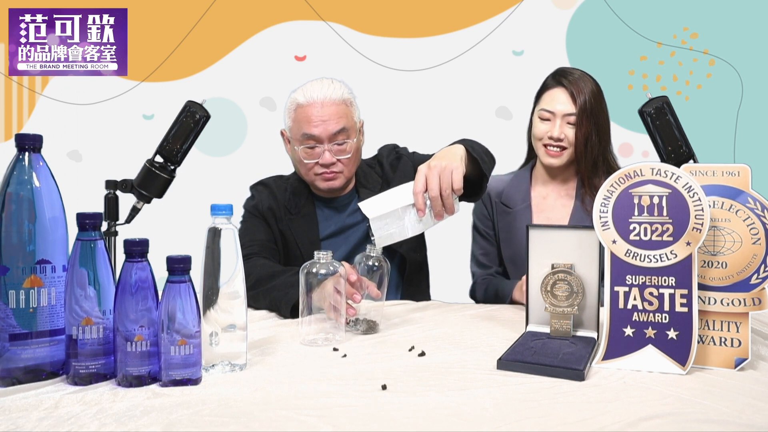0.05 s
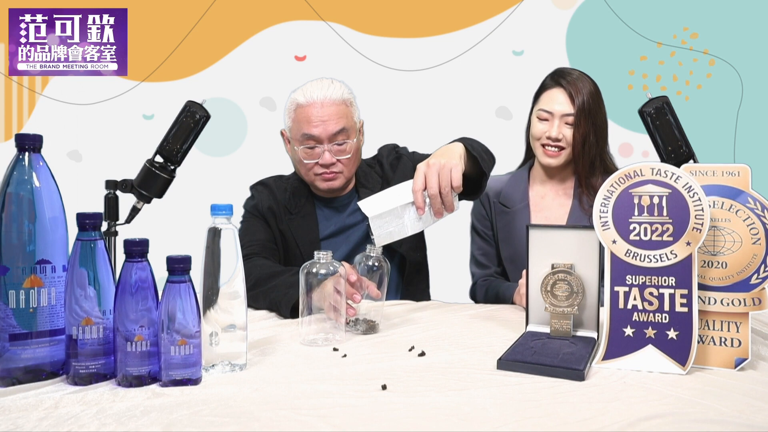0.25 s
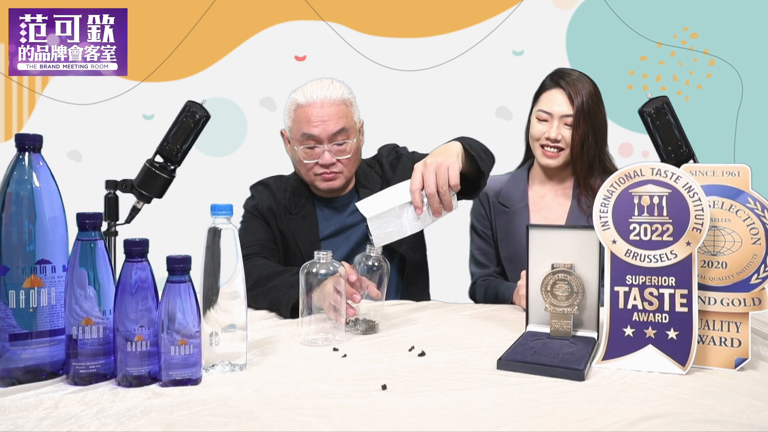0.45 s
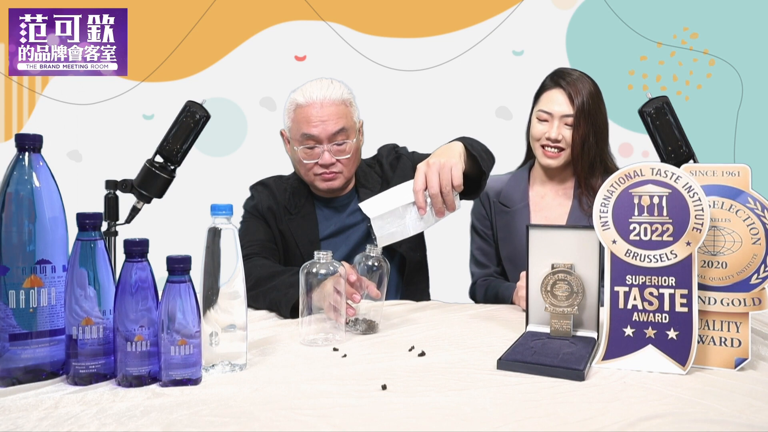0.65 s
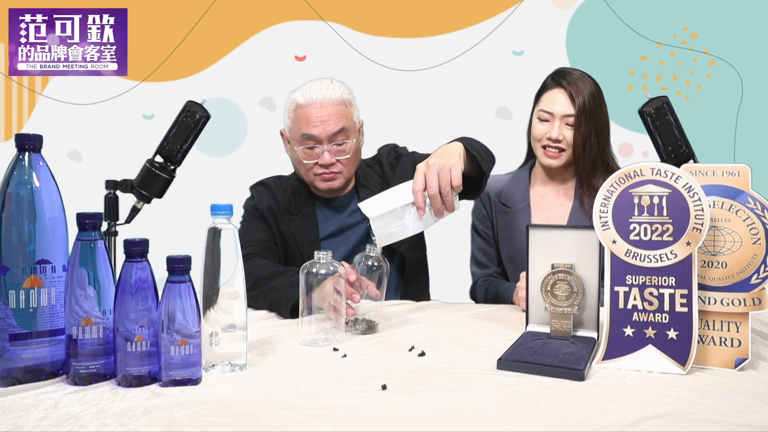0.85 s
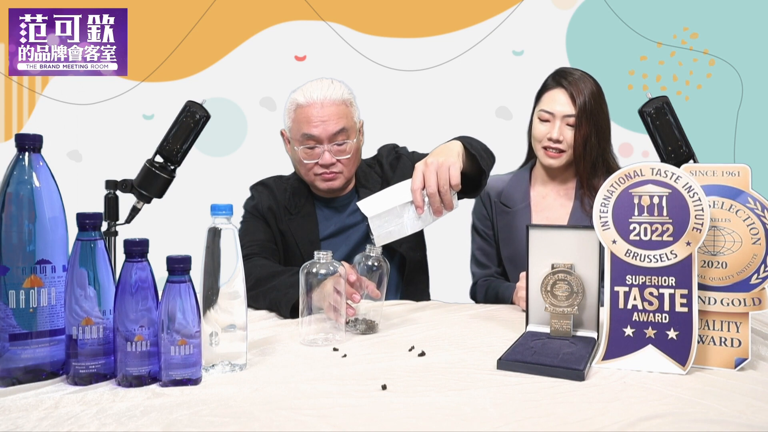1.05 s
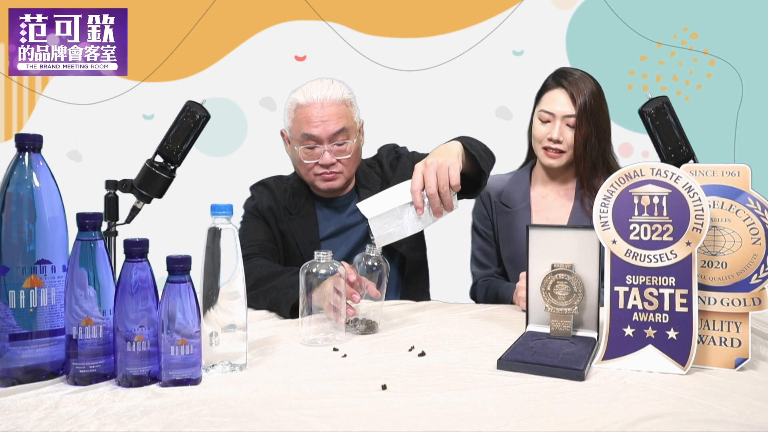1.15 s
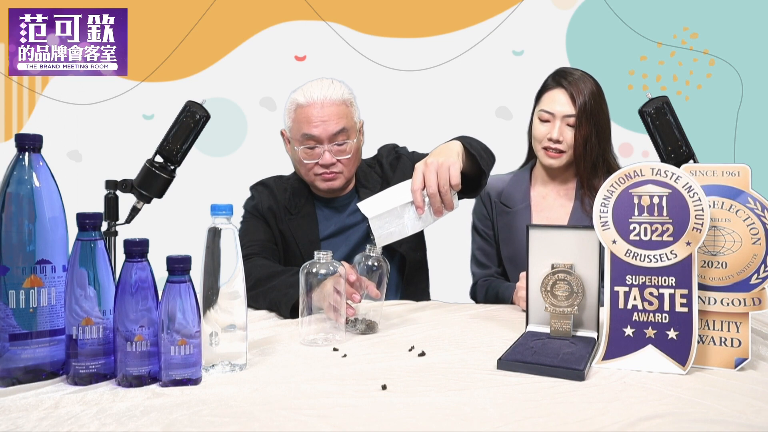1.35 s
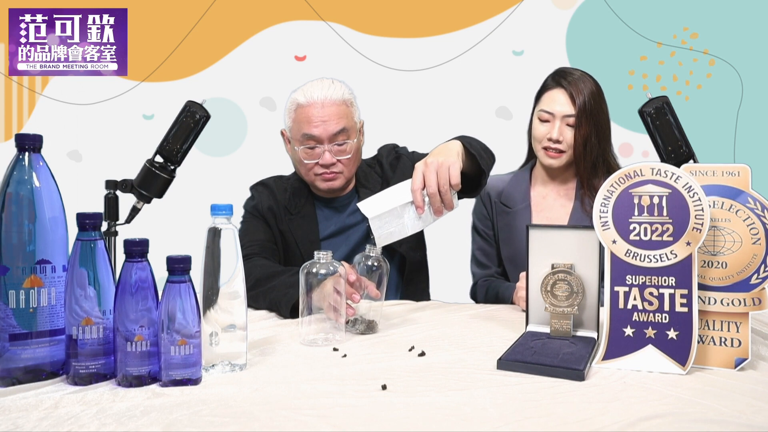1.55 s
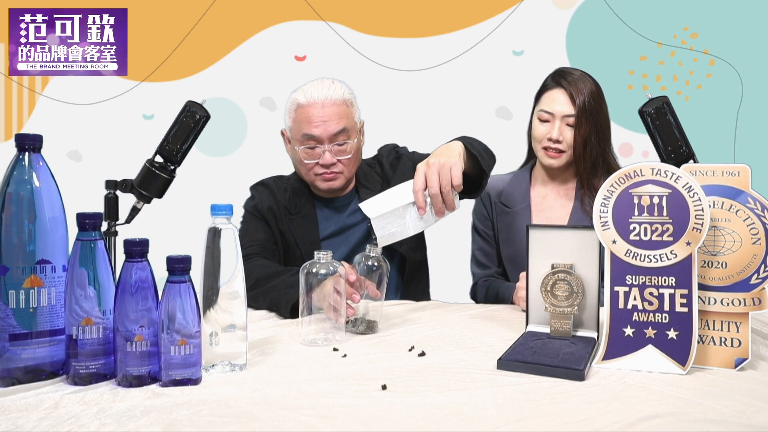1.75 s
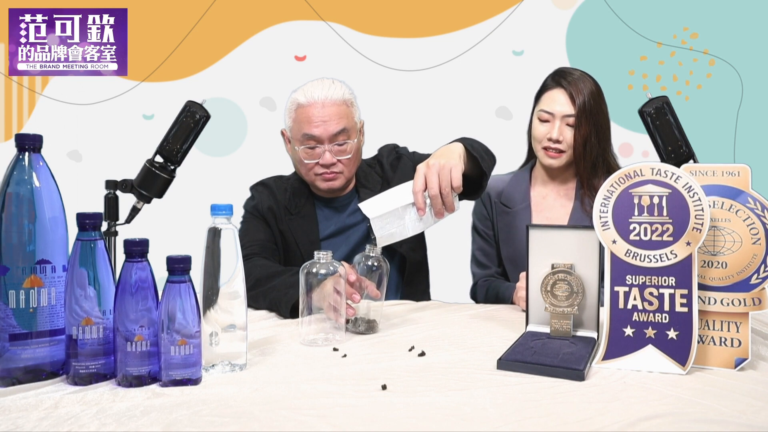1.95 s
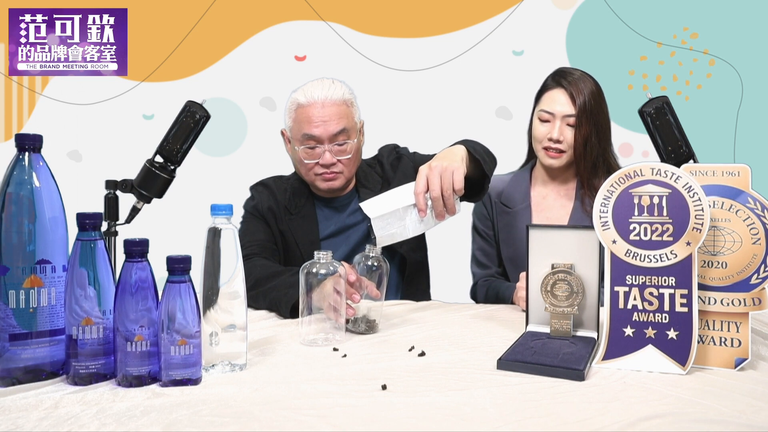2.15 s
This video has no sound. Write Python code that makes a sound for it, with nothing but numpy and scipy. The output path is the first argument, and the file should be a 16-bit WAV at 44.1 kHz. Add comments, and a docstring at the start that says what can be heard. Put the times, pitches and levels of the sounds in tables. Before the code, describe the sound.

Loose dry leaves rattle into a thin plastic bottle, a few hollow knocks and brief packet scrapes early, then busier ticking that continues to the end; close, left of centre, short room tail, faint rumble and hiss.

```python
"""Dry tea leaves are tapped out of a stiff packet into a plastic bottle, in a small damped room.
Over low rumble and faint hiss, clumps of leaves land from the start, as short shaped showers of clicks that
rattle, some with a hollow knock from the ringing wall. Early on, leaves slide in the packet (dense ticks) and
handling bumps dully (low dying sines). Later a trickle of single ticks grows into a steady patter, with
a few bright clinks (short ringing notes). A diffuse tail follows the leaves; all is panned left."""
import sys
import numpy as np
from scipy import signal
from scipy.fft import rfft, irfft
from scipy.io import wavfile
from scipy.ndimage import uniform_filter1d

SR = 44100
rng = np.random.default_rng(int(sys.argv[2]) if len(sys.argv) > 2 else 0)


def transcribe(u):
    """Save the signal u as a 16-bit wav file named by the first command-line argument.

    u: samples, shape (n,) or (channels, n), limited to [-1, 1]; the rate is SR.
    q: integer samples, one column per channel.
    """
    v = np.clip(np.atleast_2d(u).T, -1, 1)
    q = np.round(v * 32767).astype(np.int16)
    wavfile.write(sys.argv[1], SR, q)


N = 97593
TIME = np.arange(N) / SR

# Every spectrum below is a relative shape: it is scaled to unit energy before use.
# spectrum of the rumble and hiss: (frequency [Hz], density [dB per Hz])
BACKGROUND_COLOUR = [(25, 0), (45, -90), (60, -18.5), (112, -1), (160, -6), (300, -7), (500, -16.5),
                     (1500, -17), (4000, -28.5), (9000, -33.5), (15000, -31.5)]
# background level, with brief dips: (time [s], level [dB])
BACKGROUND_LEVEL = [(0, -65), (.018, -88), (.035, -58), (.25, -61), (.37, -59.5), (.405, -76.5), (.42, -59),
                    (.455, -61), (.497, -82), (.515, -64), (.66, -57.5), (.69, -76), (.73, -51.5),
                    (.785, -68.5), (.81, -60.5), (2.21, -57)]
# dull bumps of handling: (time [s], level before filtering [dB])
HANDLING_BUMPS = [(.078, -35.5), (0.414, -52), (0.508, -47.5), (0.594, -49), (0.637, -57), (.72, -82),
                  (0.818, -51), (.85, -44)]
# leaves sliding inside the packet: (time [s], peak level of the swell [dB], length [s])
PACKET_SLIDES = [(.161, -40.5, 0.017), (0.525, -52.5, 0.033), (0.56, -66, 0.0028), (0.958, -47, 0.027),
                 (1.123, -45.5, 0.025), (1.413, -43, .03)]
# spectrum of the sliding: (frequency [Hz], density [dB per Hz])
SLIDE_COLOUR = [(500, -18), (2000, -9.5), (2600, 1), (3300, 4), (4100, 0.5), (5000, -7), (6500, -12.5),
                (9000, -21), (15000, -30.5)]
# hard leaves clinking on the bottle: (time [s], level before the mode levels [dB], pitch [Hz])
LEAF_CLINKS = [(0.818, -27.5, 2500), (0.954, -38, 2430), (1.19, -30.5, 2630), (1.193, -30, 1420),
               (1.35, -30, 2570), (1.366, -18.5, 2820), (1.658, -29, 2980), (1.733, -23, 2720),
               (1.763, -28.5, 1430), (1.779, -30, 2880), (2.074, -26.5, 2710)]
# modes of a clink: (multiple of its pitch [ratio], relative level [dB], 60 dB decay [s])
CLINK_PARTIALS = [(1, -0.5, .024), (1.12, -33, 0.014), (1.45, -8, 0.015)]
# flow of single leaves, before the path levels: (time [s], level [dB])
LEAF_FLOW = [(0, -88.5), (.19, -56.5), (.3, -72.5), (.5, -92), (.6, -62.5), (.88, -75), (.95, -51),
             (1.045, -58.5), (1.1, -58), (1.18, -48.5), (1.32, -53.5), (1.4, -50.5), (1.55, -51),
             (1.6, -43), (1.74, -43), (1.81, -45), (1.93, -45.5), (2.05, -46), (2.21, -48.5)]
# spectrum of the patter: (frequency [Hz], density [dB per Hz])
PATTER_COLOUR = [(400, -22.5), (800, -0.5), (1400, 0.5), (2100, 0.5), (2750, 5), (3500, 4.5), (4400, 0.5),
                 (5500, -4), (6900, -8.5), (7800, -11.5), (10000, -16), (15000, -25)]
# spectrum of soft thuds on the pile: (frequency [Hz], density [dB per Hz])
THUD_COLOUR = [(60, -43), (150, -8.5), (280, 7), (450, 1.5), (700, 11), (1200, -29)]
# modes of the thin wall, before spot variation: (frequency [Hz], relative level [dB], 60 dB decay [s])
WALL_MODES = [(1032.3, 3.5, 0.044), (1153, -22.5, 0.053), (977, -7, 0.1), (1067, -1, 0.081),
              (1442, -5, 0.054), (1557, -14.5, 0.099), (1604, -16, 0.11), (1680, -25, 0.1),
              (2121, -25.5, 0.18)]
# landing clumps, before the trims: (time [s], hollow knock [dB], rattle [dB], crisp edge [dB], length [s])
LEAF_CLUMPS = [(0.025, -72, -67, -78, 0.0063), (0.037, -48, -48, -59, 0.011),
               (0.083, -26.5, -41, -47.5, 0.0014), (0.091, -47, -40, -46.5, 0.0012),
               (0.113, -43, -44.5, -54, 0.01), (0.413, -84, -66, -78, 0.019),
               (0.596, -63, -54.5, -67, 0.012), (0.635, -57, -51.5, -64, 0.014),
               (0.692, -74, -61.5, -70, 0.0043), (0.707, -87, -50.5, -59.5, 0.00082),
               (0.717, -50, -44, -55.5, 0.018), (0.798, -39.5, -34.5, -46, 0.0072),
               (0.814, -75, -34.5, -71, 0.0068), (0.892, -41, -38.5, -47.5, 0.0022),
               (0.896, -33.5, -38.5, -48, 0.01), (0.914, -66, -71, -49.5, 0.0013),
               (0.939, -45.5, -44.5, -66, 0.008), (0.969, -34, -33.5, -40, 0.0074),
               (1.058, -41.5, -40.5, -48, 0.017), (1.162, -63, -39, -45.5, 0.0097),
               (1.19, -59, -35, -47.5, 0.0037), (1.231, -34, -39, -60, 0.016),
               (1.24, -32, -38, -47.5, 0.012), (1.336, -36, -44, -48.5, 0.0086),
               (1.366, -25, -26, -55, 0.0013), (1.498, -45.5, -45.5, -65, 0.017),
               (1.569, -39, -37.5, -43, 0.0094), (1.586, -74, -36, -48, 0.0035),
               (1.647, -46, -40.5, -49, 0.0045), (1.693, -39.5, -44.5, -51, 0.008),
               (1.719, -64, -43, -45, 0.0042), (1.738, -72, -43, -63, 0.0018),
               (1.761, -45, -42, -65, 0.004), (1.827, -39, -34, -39.5, 0.0012),
               (1.837, -26.5, -29.5, -41, 0.0041), (1.871, -45, -39, -63, 0.0065),
               (1.906, -34.5, -34.5, -41.5, 0.015), (1.942, -29.5, -37, -45, 0.0057),
               (1.98, -70, -42, -49, 0.0025), (1.999, -29.5, -38.5, -43.5, 0.0019),
               (2.024, -68, -40.5, -48.5, 0.0033), (2.074, -44, -36, -47, 0.0098),
               (2.093, -33, -33, -45.5, 0.0069), (2.113, -67, -31.5, -37.5, 0.011),
               (2.165, -46, -46, -60, 0.0094), (2.184, -42, -42.5, -48.5, 0.0078)]
# spectrum of leaves hitting the bottle: (frequency [Hz], density [dB per Hz])
RATTLE_COLOUR = [(60, -92), (300, -25.5), (750, -30), (1300, -9.5), (2100, -2.5), (2400, 2), (2800, 5.5),
                 (3150, 1.5), (3450, 2), (3900, -4), (4350, 1), (5200, -3.5), (6300, -6.5), (7500, -19.5),
                 (15000, -34)]
# spectrum of their crisp edges: (frequency [Hz], density [dB per Hz])
EDGE_COLOUR = [(300, -83), (2000, -28), (4500, -9), (6800, 12.5), (7600, 11.5), (9300, 8), (11000, -3),
               (15000, -3)]

ROOM_T60_S, ROOM_DB, ROOM_DELAY_S, ROOM_BUILD_S, ROOM_TOP_HZ = 0.13, -6.5, 0.00067, 0.0024, 9700
BUMP_HZ, BUMP_T60_S, BUMP_SOFT_HZ, BUMP_LOW_HZ = 115, 0.087, 400, 90
SLIDE_TOUCHES_PER_S, SLIDE_RISE_SHARE = 9600, 0.29  # rise as a share of length
CLINK_LOW_HZ = 1260
LEAVES_PER_S, LEAF_SPREAD_DB = 3400, 1.5
FLOW_DB, FLOW_WALL_DB, FLOW_THUD_DB = -0.5, -18.5, -12
LEAF_LOW_HZ, LEAF_HIGH_HZ, LEAF_CYCLES = 875, 13400, 27  # a tick falls 60 dB in this many cycles
SPOT_SPREAD_DB, SPOT_DETUNE = 4.5, 0.0054  # standard deviations; detune is a share of the pitch
LEVEL_WINDOW_S = 0.01  # clump levels are rms over this window
TOUCHES_PER_S, TOUCH_SPREAD_DB = 3500, 0.5
KNOCK_TRIM_DB, RATTLE_TRIM_DB, EDGE_TRIM_DB = -1, 1, -0.5
KNOCK_PUSH_S, KNOCK_CHATTER, KNOCK_LOW_HZ = 0.000955, 0.57, 756
CLUMP_RISE_SHARE, CLUMP_TICK_SHARE, CLUMP_TICK_CYCLES = 0.34, 1.26, 33
LEAVES_LOW_HZ, LEFT_OVER_RIGHT_DB, CUTOFF_HZ = 127, 7.7, 14800


def from_db(db):
    """Decibels to gain."""
    return 10 ** (np.asarray(db) / 20)


def unit_energy(x):
    """Scale to a sum of squares of one."""
    return x / np.sqrt(np.sum(x ** 2) + 1e-20)


def gain_curve(rows):
    """Gain over time, from levels joined by straight lines in dB."""
    return from_db(np.interp(TIME, *np.transpose(rows)))


def through(x, response):
    """Send a signal through an impulse response."""
    return signal.fftconvolve(x, response)[:N]


def cut(x, hz, kind):
    """Second-order low- or high-pass."""
    sections = signal.butter(2, min(hz, SR / 2 - 1), kind, fs=SR, output="sos")
    return signal.sosfilt(sections, x)


def add(track, s, piece):
    """Mix a piece into a track at a time."""
    start = max(int(s * SR), 0)
    piece = piece[:max(N - start, 0)]
    track[start:start + len(piece)] += piece


def colour(points, size=8192):
    """Causal (minimum-phase) click with the given spectrum and unit energy."""
    hz, db = np.transpose(points)
    grid = np.maximum(np.arange(size // 2 + 1) * SR / size, 1)
    level_db = np.interp(np.log(grid), np.log(hz), db)
    cepstrum = irfft(np.log(from_db(level_db)))
    # folding the cepstrum forward in time packs the energy at the start
    cepstrum[1:size // 2] *= 2
    cepstrum[size // 2 + 1:] = 0
    return unit_energy(irfft(np.exp(rfft(cepstrum))))


def ring(hz, t60):
    """A sine that starts at unit envelope and falls 60 dB in t60 seconds."""
    t = TIME[:SR // 6]
    return np.sin(2 * np.pi * hz * t) * np.exp(-np.log(1000) * t / t60)


def touches(per_s, spread_db, size):
    """Random clicks of uneven strength and either sign, as leaves strike at chance moments."""
    strength = from_db(spread_db * np.minimum(rng.exponential(1, size), 4))
    sign = rng.choice([-1, 1], size)
    return strength * sign * (rng.random(size) < per_s / SR)


def leaf_ticks(force, cycles, count=28):
    """Deal the touches to resonators of many pitches, each dying within a set number of cycles."""
    dealt = rng.integers(0, count, len(force))
    out = 0
    for k, hz in enumerate(np.geomspace(LEAF_LOW_HZ, LEAF_HIGH_HZ, count)):
        r = from_db(-60 * hz / (cycles * SR))
        poles = [1, -2 * r * np.cos(2 * np.pi * hz / SR), r * r]
        ticks = signal.lfilter([1, 0, -1], poles, force * (dealt == k) + 1e-18)
        out = out + np.sqrt(hz * (1 - r * r)) * ticks  # evens the energy per Hz
    return unit_energy(out)


def wall():
    """One response of the thin wall: a hollow note of decaying modes, a little different at each spot."""
    spots = rng.standard_normal((len(WALL_MODES), 2))
    note = 0
    for (hz, db, t60), (louder, sharper) in zip(WALL_MODES, spots):
        mode = ring(hz * (1 + SPOT_DETUNE * sharper), t60)
        note = note + from_db(db + SPOT_SPREAD_DB * louder) * mode
    once = cut(note, KNOCK_LOW_HZ, "high")
    return unit_energy(cut(once, KNOCK_LOW_HZ, "high"))


def background():
    """Low room rumble with a faint hiss: coloured noise whose level dips briefly."""
    noise = through(rng.standard_normal(N), colour(BACKGROUND_COLOUR))
    return gain_curve(BACKGROUND_LEVEL) * noise


def room(x):
    """A short diffuse tail of decaying noise, evened out so that no pitch booms, and slightly dulled."""
    t = np.maximum(TIME[:SR // 2] - ROOM_DELAY_S, 0)
    decay = np.exp(-np.log(1000) * t / ROOM_T60_S)
    build = 1 - np.exp(-t / ROOM_BUILD_S)
    spectrum = rfft(rng.standard_normal(len(t)) * decay * build)
    smooth_power = uniform_filter1d(np.abs(spectrum) ** 2, size=30)
    even = irfft(spectrum / np.sqrt(smooth_power), len(t))
    tail = (even * (t > 0))[:SR // 3]
    return from_db(ROOM_DB) * through(x, cut(unit_energy(tail), ROOM_TOP_HZ, "low"))


def bumps():
    """The hands jog the bottle on the table: low dying sines, softened and thinned."""
    out = np.zeros(N)
    for s, db in HANDLING_BUMPS:
        add(out, s, from_db(db) * ring(BUMP_HZ, BUMP_T60_S))
    soft = cut(out, BUMP_SOFT_HZ, "low")
    return cut(soft, BUMP_LOW_HZ, "high")


def slides():
    """Leaves scrape along the packet: a dense run of tiny touches that swells and fades."""
    swell = 0
    for s, db, length in PACKET_SLIDES:
        age = np.maximum(TIME - s, 0) / max(length * SLIDE_RISE_SHARE, .001)
        swell = swell + from_db(db) * age * np.exp(1 - age)
    force = touches(SLIDE_TOUCHES_PER_S, spread_db=4.5, size=N)
    scrape = leaf_ticks(force, LEAF_CYCLES) * np.sqrt(N)  # rms of one
    return through(scrape * swell, colour(SLIDE_COLOUR))


def clinks():
    """Now and then a hard leaf gives a short, bright note of a few decaying modes."""
    out = np.zeros(N)
    for s, clink_db, pitch in LEAF_CLINKS:
        for ratio, db, t60 in CLINK_PARTIALS:
            add(out, s, from_db(clink_db + db) * ring(pitch * ratio, t60))
    return cut(out, CLINK_LOW_HZ, "high")


def trickle():
    """Single leaves tick, stir the wall and thud on the pile, all following the flow."""
    leaves = touches(LEAVES_PER_S, LEAF_SPREAD_DB, N)
    paths = ((leaf_ticks(leaves, LEAF_CYCLES), colour(PATTER_COLOUR), FLOW_DB),
             (leaves * rng.standard_normal(N), wall(), FLOW_WALL_DB),
             (leaves * rng.standard_normal(N), colour(THUD_COLOUR), FLOW_THUD_DB))
    flow = gain_curve(LEAF_FLOW) * np.sqrt(N)
    out = 0
    for force, body, db in paths:
        out = out + from_db(db) * through(unit_energy(force) * flow, body)
    return out


def clumps(size=4096):
    """Each clump is a short shower of touches that rattle, and a push that knocks the wall."""
    out, t = np.zeros(N), TIME[:size]
    rattle, edge = colour(RATTLE_COLOUR), colour(EDGE_COLOUR)
    for s, knock_db, rattle_db, edge_db, length in LEAF_CLUMPS:
        age = t / max(length, .001)
        swell = (1 - np.exp(-age / CLUMP_RISE_SHARE)) * np.exp(-(age / 2) ** 2)
        shower = unit_energy(touches(TOUCHES_PER_S, TOUCH_SPREAD_DB, size) * swell)
        ticks = shower + CLUMP_TICK_SHARE * leaf_ticks(shower, CLUMP_TICK_CYCLES)
        # one firm push, plus chatter that grows with the clump's length
        push = shower * KNOCK_CHATTER * length / LEVEL_WINDOW_S
        push[int(KNOCK_PUSH_S * SR)] += 1
        layers = ((push, wall(), knock_db + KNOCK_TRIM_DB),
                  (ticks, rattle, rattle_db + RATTLE_TRIM_DB),
                  (ticks, edge, edge_db + EDGE_TRIM_DB))
        for force, body, db in layers:
            add(out, s, from_db(db) * unit_energy(signal.fftconvolve(force, body)))
    return out * np.sqrt(LEVEL_WINDOW_S * SR)  # from unit energy to rms over the window


def scene():
    """Leaves, their room tail, bumps and background in one mono mix, panned left."""
    leaves = cut(clumps() + clinks() + slides() + trickle(), LEAVES_LOW_HZ, "high")
    mono = leaves + room(leaves) + bumps() + background()
    pan = np.array([[from_db(LEFT_OVER_RIGHT_DB)], [1]])
    return mono * pan / pan.mean()


def record(dry):
    """The top is cut steeply by an elliptic low-pass."""
    steep = signal.ellip(10, .1, 70, CUTOFF_HZ, fs=SR, output="sos")
    return signal.sosfilt(steep, dry)


dry = scene()
out = record(dry)
transcribe(out)
```